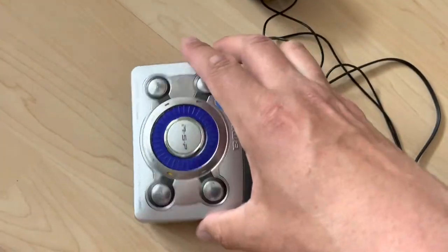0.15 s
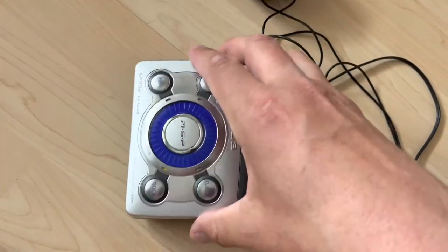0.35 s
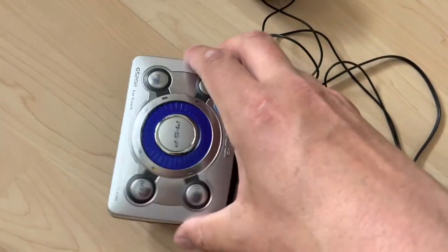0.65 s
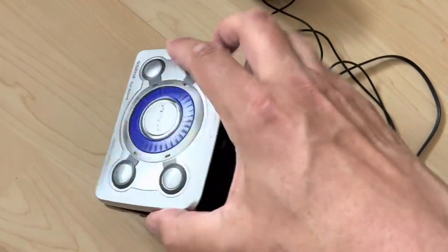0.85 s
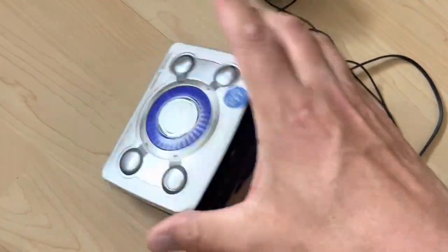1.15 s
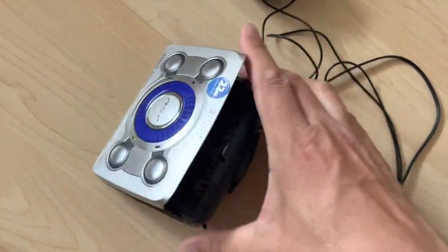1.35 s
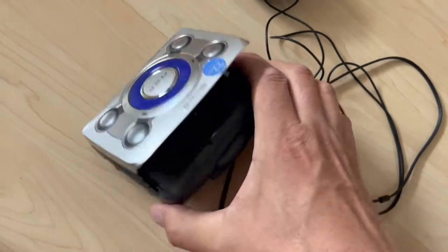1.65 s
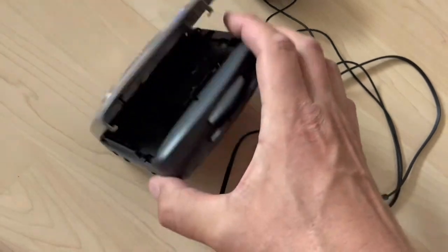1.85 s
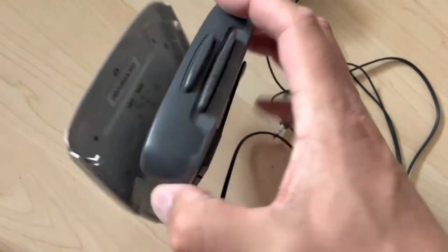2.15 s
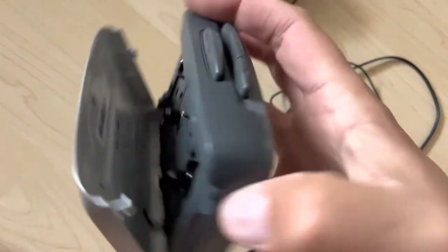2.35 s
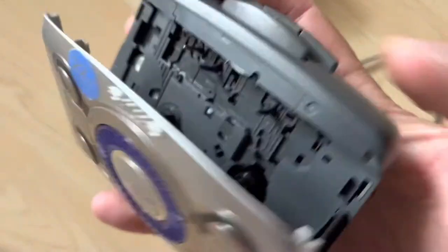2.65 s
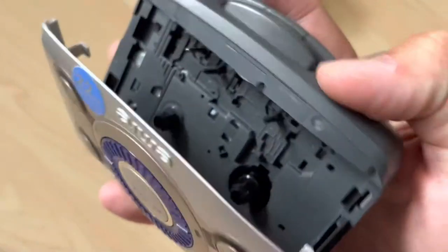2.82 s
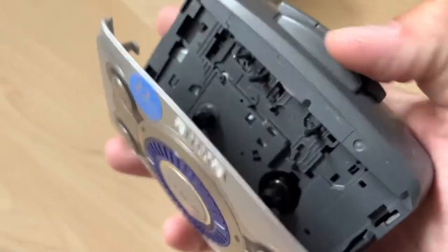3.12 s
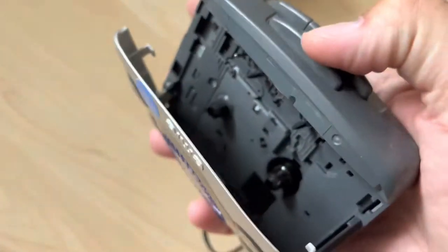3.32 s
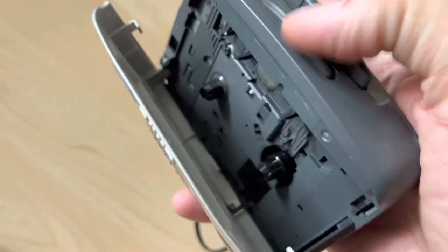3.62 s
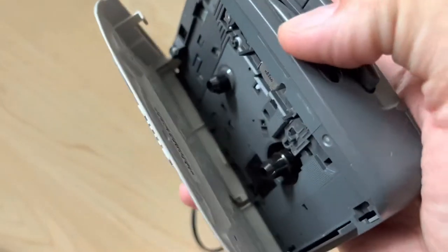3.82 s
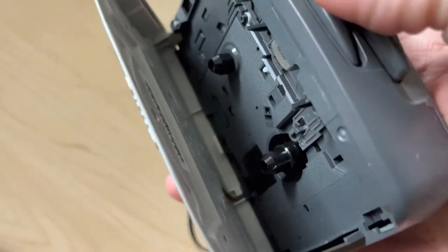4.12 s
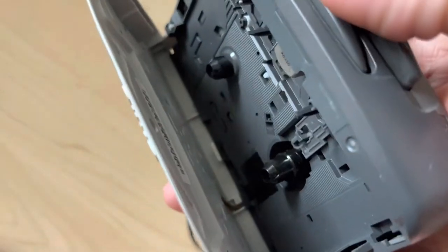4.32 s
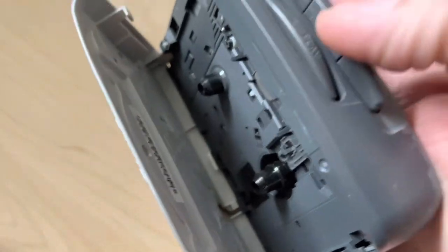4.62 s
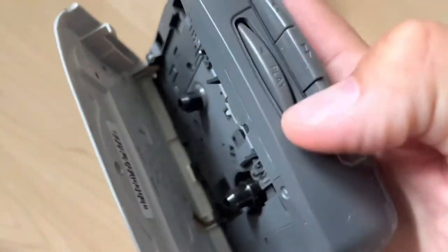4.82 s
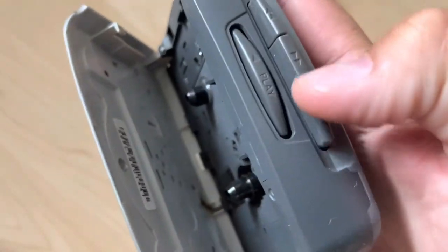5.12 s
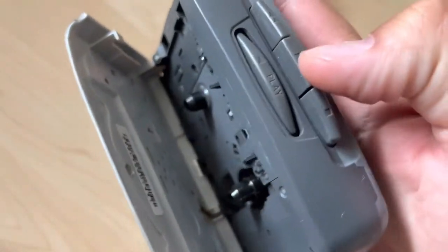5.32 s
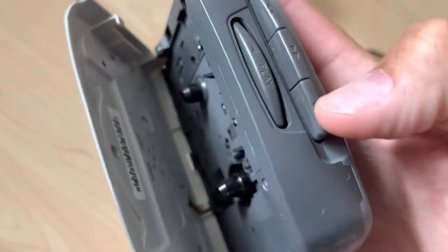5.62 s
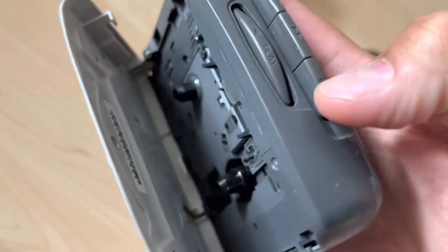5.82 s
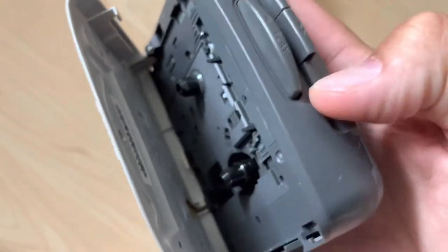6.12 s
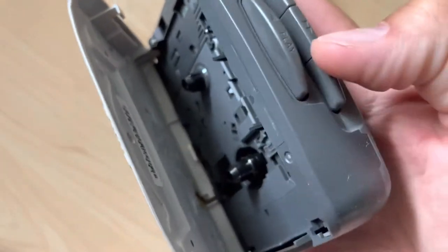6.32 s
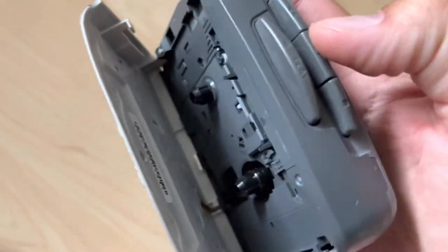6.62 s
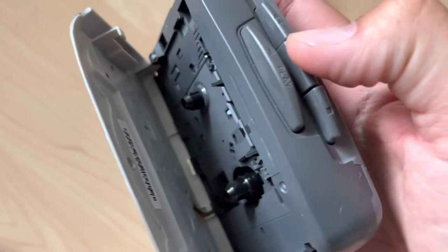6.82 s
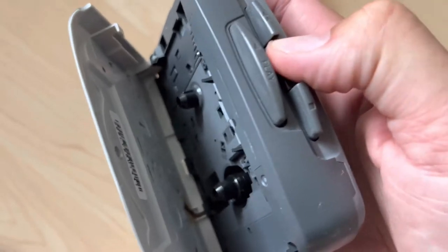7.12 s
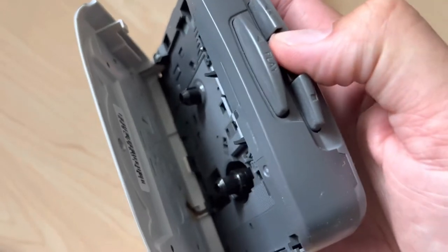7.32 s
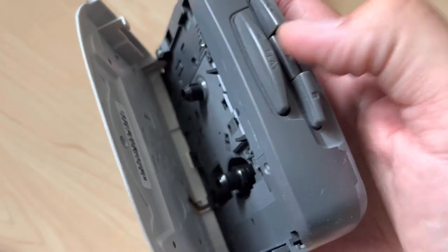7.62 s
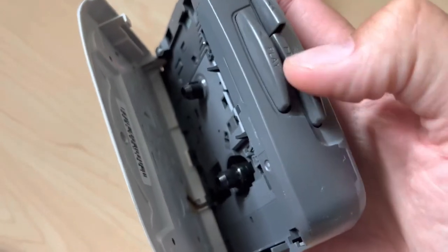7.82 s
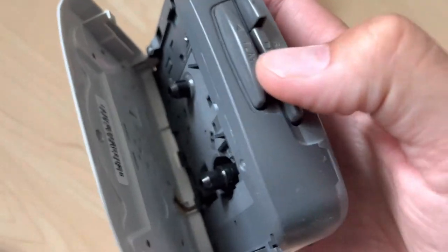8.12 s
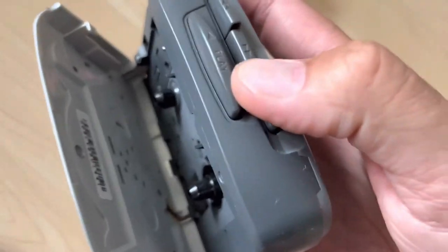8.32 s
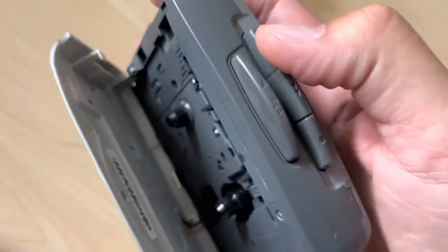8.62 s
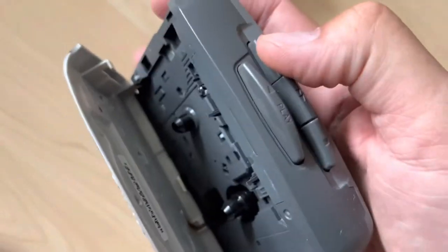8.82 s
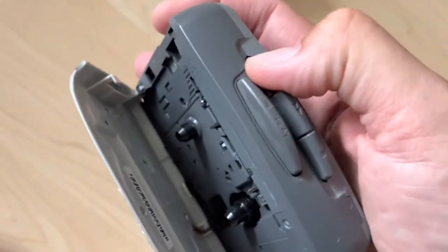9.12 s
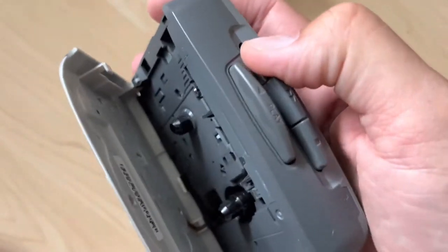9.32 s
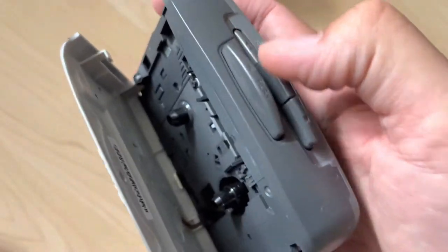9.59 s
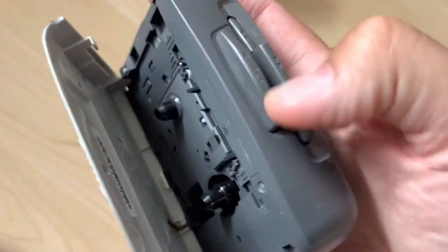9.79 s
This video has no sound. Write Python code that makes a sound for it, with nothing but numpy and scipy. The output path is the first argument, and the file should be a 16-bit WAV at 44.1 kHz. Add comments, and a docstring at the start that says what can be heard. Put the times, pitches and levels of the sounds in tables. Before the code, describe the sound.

A small plastic cassette player is tipped and knocked on a wooden floor, creaks open, then its keys snap sharply and a little motor whirs three times.

```python
"""A portable cassette player close to a pair of microphone ports, over a faint hiss and low handling rumble.
First it is tipped over on a wooden floor: the case clicks and rings, and modes of the floor boom under it.
Then it is opened and picked up: loose parts click, plastic creaks and fingers rub it with filtered noise.
Last its keys snap, as bursts of contacts, and the little motor runs three times, a whir with regular ticks
and resonant whines; two runs coast down, and the third lasts to the end."""
import sys
import numpy as np
from scipy import signal
from scipy.fft import rfft, irfft, next_fast_len
from scipy.io import wavfile
from scipy.ndimage import map_coordinates

SR = 44100
rng = np.random.default_rng(int(sys.argv[2]) if len(sys.argv) > 2 else 0)


def store_pcm(level_fs):
    """Save levels as 16-bit WAV."""
    pcm = np.round(np.clip(level_fs, -1, 1) * 32767).astype(np.int16)
    wavfile.write(sys.argv[1], SR, np.atleast_2d(pcm).T)


N = 438794
TIME = np.arange(N) / SR
BINS_HZ = np.fft.rfftfreq(2048, 1 / SR)


def amp(db):
    """Turns decibels into a gain."""
    return 10 ** (np.asarray(db) / 20)


def evened(x):
    """Scales to rms 1."""
    return x / np.sqrt(np.mean(x ** 2) + 1e-20)


def read(points, hz):
    """Reads a table on a log-frequency axis."""
    f, value = np.transpose(points)
    return np.interp(np.log(hz + 1), np.log(f + 1), value)


def add(mix, s, sound):
    """Mixes a sound in at s seconds."""
    part = mix[max(round(s * SR), 0):][:len(sound)]
    part += sound[:len(part)]


def colour(x, spectrum):
    """Gives a steady sound a spectrum, at rms 1."""
    gain = amp(read(spectrum, np.fft.rfftfreq(len(x), 1 / SR)))
    return evened(irfft(rfft(x) * gain, len(x)))


def causal(gain):
    """The quickest-dying impulse response that has this gain."""
    cepstrum = irfft(np.log(gain))
    half = len(cepstrum) // 2
    cepstrum[1:half] *= 2
    cepstrum[half + 1:] = 0
    return irfft(np.exp(rfft(cepstrum)))


def wander(per_s):
    """A random curve of rms 1 that changes per_s times a second."""
    knots = rng.standard_normal(4096)
    return evened(np.interp(TIME * per_s, np.arange(len(knots)), knots))


def held(start, stop, fade_s):
    """Fades in after start and out after stop."""
    return np.clip((TIME - start) / fade_s, 0, 1) * np.clip(1 + (stop - TIME) / fade_s, 0, 1)


def resonate(x, hz, width):
    """A steep resonance, at rms 1: the same peak twice in a row."""
    peak = signal.iirpeak(hz, hz / width, SR)
    once = signal.lfilter(*peak, x)
    return evened(signal.lfilter(*peak, once))


def tilted(x, tilt_db, pivot_hz=3000, flat_below_hz=700):
    """Harder contacts are brighter: a slope in dB per octave."""
    octaves = np.log2(np.maximum(BINS_HZ, flat_below_hz) / pivot_hz)
    return signal.fftconvolve(x, causal(amp(tilt_db * octaves)))


# colour of the quiet room: f/Hz, level/dB
AIR_COLOUR = [(20, 1), (60, -8), (200, -4.5), (600, 0), (2000, -9), (6000, -22.5), (15000, -21.5)]


def air(level_db=-77):
    """Faint steady hiss, independent at each port."""
    return amp(level_db) * np.array([colour(rng.standard_normal(N), AIR_COLOUR) for side in range(2)])


# reverberation: f/Hz, time to fall 60 dB t60/s
ROOM_DECAY = [(150, 0.75), (500, 0.11), (2000, 0.39), (5000, 0.14), (10000, 0.19), (16000, 0.49)]


def room(x, first_s=0.00077):
    """Three unrelated tails of a small room, each band dying at its own speed."""
    t = np.arange(SR // 2) / SR
    noise = rng.standard_normal((3, len(t))) * (t > first_s)
    hz, age, bands = signal.stft(noise, SR, nperseg=256)
    decay = amp(-60 * age / read(ROOM_DECAY, hz)[:, None])
    tail = signal.istft(bands * decay, SR, nperseg=256)[1]
    return signal.fftconvolve(x[None], tail / np.linalg.norm(tail[0]), axes=1)[:, :N]


# low rumble of handling over time: t/s, level/dB
RUMBLE_SWELL = [(0.0, -56.5), (0.19, -51), (0.58, -58.5), (1.11, -55), (1.8, -58), (2.19, -66.5),
                (4.82, -65), (4.99, -71), (6.9, -68.5), (7.15, -75), (7.76, -72), (9.95, -88)]
# colour of that rumble: f/Hz, level/dB per Hz
RUMBLE_COLOUR = [(20, -28), (35, -15.5), (52, 6.5), (70, 4), (100, -8.5), (180, -11.5), (300, -22),
                 (600, -28.5), (1500, -58), (6000, -81.5)]
# colour of the jolt that a key gives the hand: f/Hz, level/dB per Hz
JOLT_COLOUR = [(25, -18), (60, 0), (150, -4.5), (220, -5), (400, -22.5), (1500, -60)]


def rumble(level_db=3.5, lumpy_db=3, jolt_db=-50, jolt_s=.035):
    """Lumpy low noise of moving hands, and a soft jolt with each snap of a key."""
    swell_db = np.interp(TIME, *np.transpose(RUMBLE_SWELL))
    level = amp(level_db + swell_db + lumpy_db * wander(8.9))
    jolts = sum((TIME > s) * np.exp(-abs(TIME - s) / jolt_s) for s, *_ in KEY_SNAPS)
    moving = level * colour(rng.standard_normal(N), RUMBLE_COLOUR)
    return moving + amp(jolt_db) * jolts * colour(rng.standard_normal(N), JOLT_COLOUR)


# colour of rubbed plastic: f/Hz, level/dB per Hz
RUB_COLOUR = [(30, -40.5), (200, -20.5), (550, -10.5), (850, -4.5), (1400, -1), (2500, -0.5), (4000, -5),
              (6200, -10), (8500, -14), (12000, -18.5), (15500, -26)]
# how hard the hand works the case while it tips it over and picks it up: t/s, level/dB
HAND_EFFORT = [(0.0, -71), (0.35, -70.5), (0.4, -62.5), (0.89, -62), (1.07, -64), (1.19, -62), (1.28, -60),
               (1.5, -57.5), (1.88, -60), (2.09, -66.5), (2.86, -60), (3.01, -59), (3.04, -58), (3.17, -61),
               (3.29, -76), (3.55, -69.5)]
# one row a distinct slide of skin or plastic along the case:
# middle t/s, length t/s, level/dB, brightness/dB per octave
SLIDES = [(0.172, 0.15, -48.5, -5), (1.138, 0.11, -43.5, 0), (1.924, 0.18, -54, -0.5),
          (3.023, 0.5, -57.5, 4), (3.544, 0.24, -66.5, -3.5), (4.392, 0.26, -60, -4),
          (4.703, 0.18, -52, 1.5), (6.178, 0.2, -60.5, 0), (6.397, 0.27, -60.5, 1), (6.578, 0.1, -64, 0.5),
          (8.429, .1, -47, 3.5), (9.867, 0.61, -57.5, 3.5)]


def fingers(slide_gain_db=-3, slips_per_s=400, slip_db=-3, split_hz=2400,
            grip_db=-2.5, grip_tilt_db=0.5, uneven_db=2,
            scuff_s=0.11, scuff_db=-42, scuff_tilt_db=0.0, press_s=0.062, press_db=-52):
    """A hiss of friction with many tiny slips: it follows the effort of the hand and swells in single strokes."""
    slips = evened((rng.random(N) < slips_per_s / SR) * rng.standard_normal(N))
    friction = colour(rng.standard_normal(N) + amp(slip_db) * slips, RUB_COLOUR)
    # the case answers unevenly in the middle range; the hiss of skin above it is smoother
    lowpass = signal.butter(2, split_hz, fs=SR, output="sos")
    body = signal.sosfiltfilt(lowpass, friction)
    friction = body * amp(2.5 * wander(70)) + (friction - body) * amp(1.1 * wander(40))
    effort_db = np.interp(TIME, *np.transpose(HAND_EFFORT), right=-np.inf)
    grip = friction * amp(grip_db + effort_db + uneven_db * wander(16))
    out = tilted(grip, grip_tilt_db)[:N]
    # the case scuffs along the floor around each drop, and the thumb rubs each key as it presses
    scuffs = [(s + scuff_s / 4, scuff_s, db + scuff_db, scuff_tilt_db) for s, db, *_ in FLOOR_DROPS]
    presses = [(s - press_s / 4, press_s, press_db, 0) for s, *_ in KEY_SNAPS]
    for middle, length, db, tilt_db in SLIDES + scuffs + presses:
        during = abs(TIME - middle) < length / 2
        swell = np.cos(np.pi * (TIME[during] - middle) / length)
        stroke = tilted(swell * friction[during], tilt_db)
        add(out, middle - length / 2, amp(slide_gain_db + db) * stroke)
    return out


def off_hands(x):
    """The hands scatter a little middle treble to each port along different short paths."""
    treble = [(300, -8), (1500, -6), (3000, 0), (5000, 0), (7000, -8), (16000, -8)]  # f/Hz, level/dB
    paths = np.array([colour(rng.standard_normal(128), treble) for side in range(2)])
    paths /= np.linalg.norm(paths[0])
    return amp(-19) * signal.oaconvolve(x[None], paths, axes=1)[:, :N]


# colour of a contact: f/Hz, level/dB per Hz
CRACK_COLOUR = [(25, -48), (70, -27.5), (150, -25), (310, -12.5), (550, -34.5), (850, -7.5), (1300, -5),
                (2000, -1.5), (3000, 2.5), (4400, -1.5), (6200, 0.5), (8000, -7.5), (11500, -8),
                (15500, -19)]
# what the case rings with: f/Hz, level/dB, time to fall 60 dB t60/s
CASE_RING = [(330, -21, .07), (526, -22.5, 0.034), (772, -20, 0.15), (830, -18.5, 0.12),
             (1262, -4.5, 0.059), (1485, -5.5, 0.06073), (1883, 0.5, 0.054), (2367, -13, 0.15),
             (3070, -5.5, 0.13), (3378, -2, 0.094), (4130, 1, 0.052), (4910, -1.5, 0.058),
             (8050, -16.5, 0.019), (8100, -5, .045)]


def contact(db, tilt_db, rise_s=0.0007, rattle_s=0.019, rattle_db=-25,
            ring_db=-11, crack_db=-1, scatter_db=4, detune=0.018):
    """One contact chatters for a few milliseconds, shakes loose parts and sets the case ringing."""
    t = np.arange(SR // 8) / SR
    lead_s, chatter_s = .004, .0024
    age = np.maximum(t - lead_s, 0)
    mode_hz, mode_db, t60 = np.transpose(CASE_RING)[:, :, None]
    crack = causal(evened(amp(read(CRACK_COLOUR, BINS_HZ))))
    # parts slide into contact, then settle
    approach = np.exp(np.minimum(t - lead_s, 0) / rise_s)
    settling = np.exp(-age / chatter_s) + amp(rattle_db) * np.exp(-age / rattle_s)
    chatter = rng.standard_normal(len(t)) * approach * settling
    burst = signal.fftconvolve(chatter / np.linalg.norm(chatter), crack)[:len(t)]
    # the grip and the place of contact shift the modes and their shares
    shift, share, side = rng.standard_normal((3, len(t60), 1))
    level = np.sign(side) * amp(mode_db + scatter_db * share - 60 * age / t60)
    ring = (level * np.sin(2 * np.pi * mode_hz * (1 + detune * shift) * age)).sum(0)
    hit = amp(crack_db) * burst + amp(ring_db) * ring / np.linalg.norm(ring)
    return lead_s, amp(db) * tilted(hit, tilt_db)


def clicks(rows):
    """Plays contacts given as (t/s, level/dB, brightness/dB per octave)."""
    out = np.zeros(N)
    for s, db, tilt_db in rows:
        lead_s, sound = contact(db, tilt_db)
        add(out, s - lead_s, sound)
    return out


def creaks(count=28, over_effort_db=32, spread_db=3, tilt_db=-5.0, tilt_spread_db=3.5):
    """Small ticks of plastic come at random while the hand works the case, louder with effort."""
    when, effort_db = np.transpose(HAND_EFFORT)
    s = (np.arange(count) + rng.random(count)) / count * when[-1]
    size, hardness = rng.standard_normal((count, 2)).T
    level_db = np.interp(s, when, effort_db) + over_effort_db + spread_db * size
    return clicks(zip(s, level_db, tilt_db + tilt_spread_db * hardness))


# one row a click of the door or a loose part: t/s, level/dB, brightness/dB per octave
PART_CLICKS = [(0.172, -18.5, 2), (0.225, -25, 1), (0.479, -11, -7.5), (0.603, -21, -5), (0.651, -11, 2),
               (0.662, -13, -6.5), (0.794, -20, -5.5), (1.0215, 4.5, -0.5), (1.042, -4.5, 1.5),
               (1.133, -5, -6), (1.17, -6.5, -2.5), (1.867, -22, -11), (1.919, -13, -5.5),
               (2.0147, -22, -6.5), (2.161, -28.5, -2.5), (2.231, -16.5, 3.5), (2.473, -13.5, -2),
               (2.483, -11.5, -4), (2.499, -15.5, -4), (2.512, -15.5, -4.5), (2.549, -15.5, 1),
               (2.712, -13, -2.5), (2.772, -19.5, -2), (2.906, -14, 1), (3.855, -8.5, 1.5),
               (3.902, -4.5, 0), (4.595, -23.5, -4.5), (4.963, -24.5, -4), (5.354, -26, -0.5),
               (6.134, -13.5, -2.5), (6.173, -10.5, -2.5), (6.803, -30, -1.5), (8.136, -18, 0),
               (9.346, -23.5, -4.5)]


def loose_parts():
    """The door and loose parts strike the case, each a single contact."""
    return clicks(PART_CLICKS)


# one row a drop of the case on the floor: t/s, click level/dB, brightness/dB per octave, boom level/dB
FLOOR_DROPS = [(0.006, -16, -9.5, -25.5), (0.106, -28, -9.5, -29), (0.187, -15.5, -6.5, -29),
               (0.28, -21.5, -9.5, -24), (0.4, -27.5, -13, -30), (0.8148, -4.5, -4, -23),
               (1.027, 3.5, -11.5, 1), (1.094, -4, 0.5, -23), (1.108, -4, -6, -18.5), (1.158, -3, -3, -19),
               (1.187, -18, -6, -21.5), (1.258, -7, -1, -12.5), (1.49, -7, -3.5, -12),
               (1.6049, -9, 0.5, -14.5), (1.749, -21, -5, -20.5)]
# what the floor rings with: f/Hz, level/dB, time to fall 60 dB t60/s
FLOOR_RING = [(130.5, -8.5, 0.063), (162.9, 10.5, 0.068), (154.5, -18, .3), (196.5, 0, 0.061),
              (329, -13.5, 0.066), (531.4, -24, 0.07), (706, -23.5, .07), (833.3, -11.5, 0.034)]


def drop_clicks():
    """The case itself clicks and rings as it meets the floor."""
    return clicks(drop[:3] for drop in FLOOR_DROPS)


def knocks(rise_cycles=1.52, lag_s=.003, rebound_s=0.075, rebound_db=-20, detune=0.022, level_db=-1):
    """The floor swells into a short low boom under each drop, and the case rocks back once."""
    out, t = np.zeros(N), np.arange(SR // 3) / SR
    hardness = .24  # hard drops reach the higher modes
    hz, mode_db, t60 = np.transpose(FLOOR_RING)[:, :, None]
    reach = 1 + hardness * np.maximum(np.log2(hz / hz[3]), 0)
    swell = 1 - np.exp(-(t * hz / rise_cycles) ** 2)
    decay = amp(mode_db - 60 * t / t60)
    for (s, _, _, boom_db), shift in zip(FLOOR_DROPS, rng.standard_normal(len(FLOOR_DROPS))):
        modes = decay * swell * np.sin(2 * np.pi * hz * (1 + detune * shift) * t)
        for after_s, db in (lag_s, boom_db), (lag_s + rebound_s, boom_db + rebound_db):
            add(out, s + after_s, (amp(level_db + db * reach) * modes).sum(0))
    return out


# one row a run of the motor: start t/s, stop t/s, turns a second/Hz, tick level/dB, whir level/dB,
# lead of one tick over the others/dB, whine f/Hz, level of the brush resonances/dB,
# gear noise f/Hz, gear noise level/dB
MOTOR_RUNS = [(3.645, 5.975, 45, -63.5, -58, -1.5, 8170, -68, 2246, -73),
              (6.933, 8.385, 62, -64.5, -60.5, 4, 8170, -67.5, 2640, -66),
              (8.95, 9.96, 50, -62, -63, -2.5, 7970, -73, 4370, -72)]
# colour of the ticks: f/Hz, level/dB per Hz
TICK_COLOUR = [(200, -21.5), (2200, -10), (3300, -9.5), (4600, -9), (5600, -3.5), (6800, 12), (7700, 4.5),
               (8500, -7.5), (8850, -8), (9700, -1.5), (10800, -12.5), (13000, -9), (15500, -18)]
# colour of the belt and gears: f/Hz, level/dB per Hz
WHIR_COLOUR = [(100, -6.5), (200, -6), (450, -12), (740, -13), (850, 4), (980, -6), (1400, -2),
               (2000, -4.5), (2400, -3), (2900, -4), (5000, -11), (9000, -8.5), (15000, -30.5)]
# resonances that the sliding brushes excite: f/Hz, width f/Hz, level/dB
BRUSH_RING = [(4930, 540, 2), (9420, 450, -4.5)]


def motor(count=5, wow=0.00032, tick_s=0.00086, uneven_db=0.6, grit=0.27, waver_db=1.93, spin_up_s=.03,
          coast_s=0.35, whine_db=-66.0, whine_width_hz=350, gear_width_hz=550):
    """The motor ticks several times a turn, alike on every turn, over the whir of belt and gears; its brushes whine."""
    out, tick_count = np.zeros(N), 4096
    whir = colour(rng.standard_normal(N), WHIR_COLOUR) * amp(waver_db * wander(14))
    for start, stop, turn_hz, tick_db, whir_db, lead_db, whine_hz, brush_db, gear_hz, gear_db in MOTOR_RUNS:
        # once switched off, the flywheel coasts towards rest
        speed = np.clip(1 - (TIME - stop) / coast_s, 0, 1)
        turn_rate = turn_hz * np.where(speed > 0, speed, 1) * (1 + wow * wander(10))
        turns = np.cumsum(turn_rate) / SR
        segment = (turns * count).astype(int)
        since_tick = (turns * count % 1) / (count * turn_hz)
        force_db = uneven_db * rng.standard_normal(tick_count)[segment] + lead_db * (segment % count == 0)
        # the same surface passes on every turn, with some fresh grit
        surface = rng.standard_normal(SR // 42)
        place = turns % 1 * len(surface)
        sliding = map_coordinates(surface, [place], order=3, mode="grid-wrap")
        sliding = sliding + grit * rng.standard_normal(N)
        ticks = evened(sliding * amp(force_db) * np.exp(-since_tick / tick_s))
        running = speed ** 1.3 * np.clip((TIME - start) / spin_up_s, 0, 1)
        drive = ticks / 2 + sliding
        whine = amp(whine_db) * resonate(drive, whine_hz, whine_width_hz)
        whine += amp(gear_db) * resonate(drive, gear_hz, gear_width_hz)
        whine += sum(amp(brush_db + db) * resonate(drive, hz, width) for hz, width, db in BRUSH_RING)
        ticking = amp(tick_db) * colour(ticks, TICK_COLOUR)
        out += running * (ticking + amp(whir_db) * whir + whine * held(start, stop, .1))
    return out


# one row a snap of a key: t/s, level/dB, brightness/dB per octave, delay of the latch t/s,
# latch level over key/dB, thud level of the chassis/dB
KEY_SNAPS = [(3.6226, 3.5, 0, .014, 1.5, -1.5), (5.9706, 12, 1, 0.0073, 0.5, 5),
             (6.9202, 6, 1, 0.0031, 5, -12), (8.1961, 7.5, 0.55, 0.0033, -7, -10),
             (8.3845, 7.5, 2.5, .002, -11, -21), (8.9345, 6, 0.9, 0.0045, 2.5, -9.5)]


def keys(latch_tilt_db=-1.7, travel_s=0.0034, travel_db=-22, thud_s=.004, thud_tilt_db=-7):
    """A key scrapes down its guide and hits its stop; a moment later the chassis thuds and the latch snaps."""
    rows = []
    for s, db, tilt_db, delay_s, latch_db, thud_db in KEY_SNAPS:
        rows += [(s - travel_s, db + travel_db, tilt_db),
                 (s, db, tilt_db),
                 (s + thud_s, thud_db, thud_tilt_db),
                 (s + delay_s, db + latch_db, tilt_db + latch_tilt_db)]
    return clicks(rows)


# phase by which the left port leads: f/Hz, phase/rad
LEFT_LEAD = [(0, 0), (150, -.13), (450, -.8), (800, -.7), (950, -.2), (1250, -.35), (1500, 0), (2100, .4),
             (2850, 2.3), (4200, 1), (5100, 1.6), (5850, 3.1), (6500, 3.3), (7200, 4.8), (8500, 6.2),
             (9600, 6.4), (11000, 8.4), (12200, 9.4), (13500, 9.7), (14700, 12.3), (16000, 12.5)]
# left minus right: f/Hz, level/dB
LEFT_OVER_RIGHT = [(100, 1), (700, -4), (1700, -0.5), (2900, -2), (4500, -1), (6000, 0), (15000, 0.5)]


def ports(x):
    """Near sound reaches the two ports with a phase and level difference that depends on frequency."""
    size = next_fast_len(N + SR // 10)
    hz = np.fft.rfftfreq(size, 1 / SR)
    lead = np.interp(hz, *np.transpose(LEFT_LEAD))
    half = amp(read(LEFT_OVER_RIGHT, hz) / 2) * np.exp(.5j * lead)  # each port takes half the difference
    return irfft(rfft(x, size) * np.array([half, 1 / half]), size)[:, :N]


def scene(shared_room_db=-24, wide_room_db=-22, floor_room_db=-17):
    """The player close up, with the room far below it."""
    plastic = keys() + loose_parts() + drop_clicks() + creaks()
    player, floor = plastic + motor() + fingers(), knocks()
    echoes = room(player)
    near = player + floor + rumble()
    near += amp(shared_room_db) * echoes[0] + amp(floor_room_db) * room(floor)[0]
    return ports(near) + off_hands(player) + amp(wide_room_db) * echoes[1:] + air()


def record(dry, bass_cut_hz=36, overload=.88, edge_hz=16250):
    """The microphone's bass cut, overload, then the band limit."""
    bass_cut = signal.butter(2, bass_cut_hz, "highpass", fs=SR, output="sos")
    heard = np.clip(signal.sosfilt(bass_cut, dry), -overload, overload)
    band_limit = signal.firwin(255, edge_hz, window=("kaiser", 9), fs=SR)
    return signal.oaconvolve(heard, band_limit[None], "same")


dry = scene()
out = record(dry)
store_pcm(out)
```